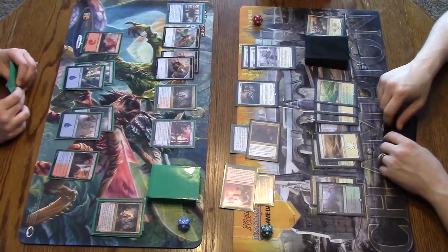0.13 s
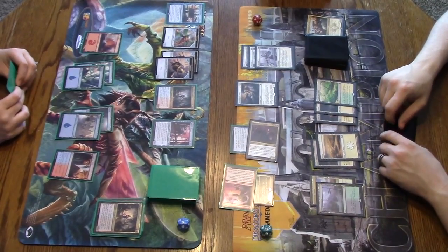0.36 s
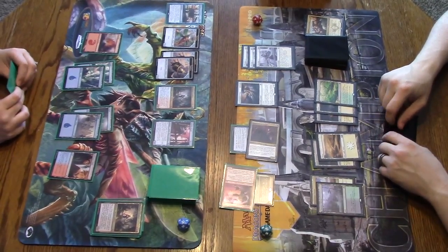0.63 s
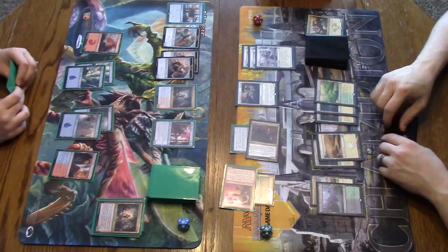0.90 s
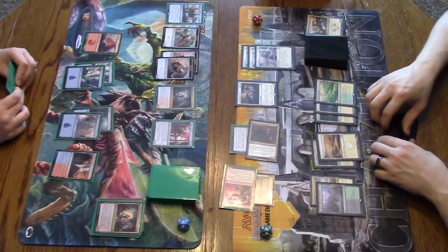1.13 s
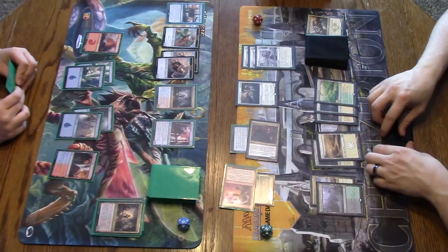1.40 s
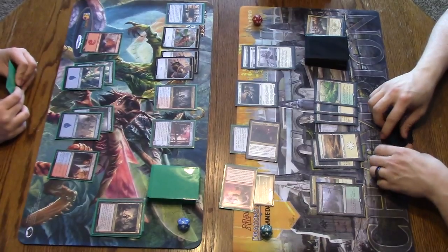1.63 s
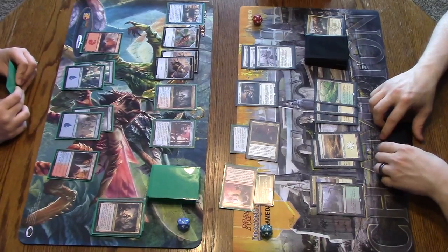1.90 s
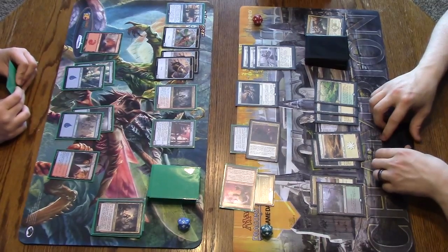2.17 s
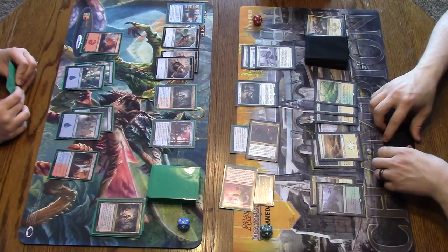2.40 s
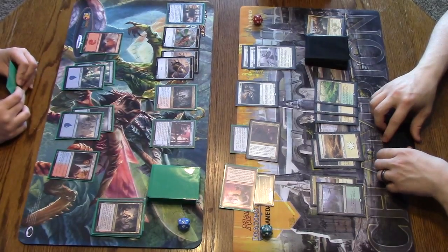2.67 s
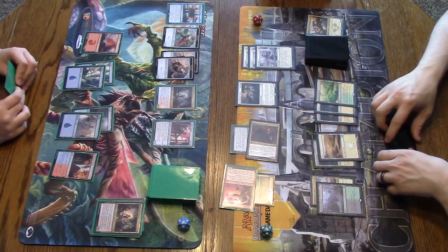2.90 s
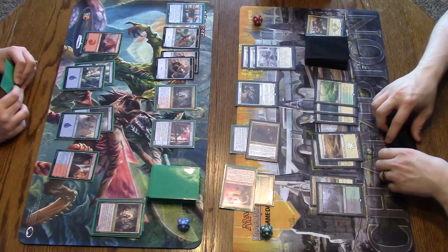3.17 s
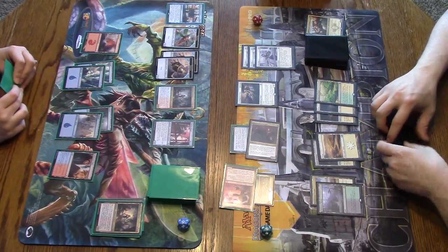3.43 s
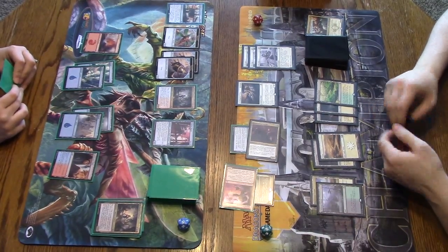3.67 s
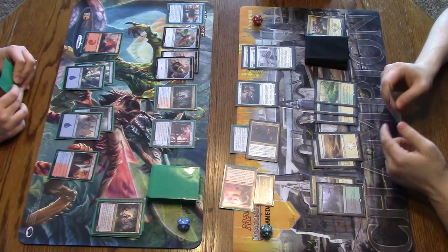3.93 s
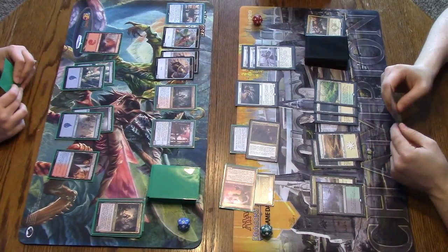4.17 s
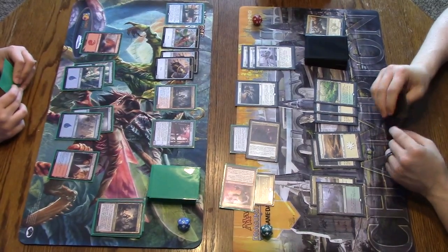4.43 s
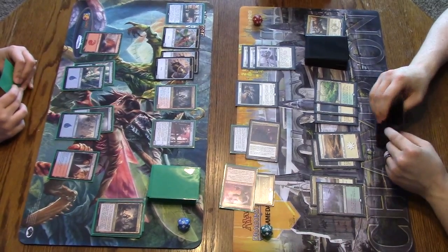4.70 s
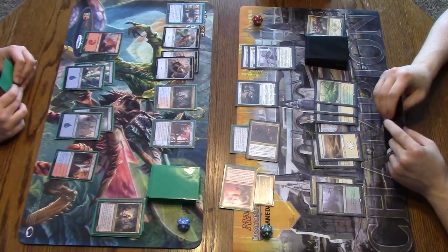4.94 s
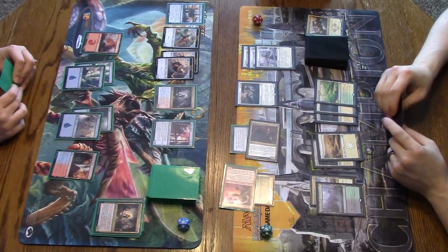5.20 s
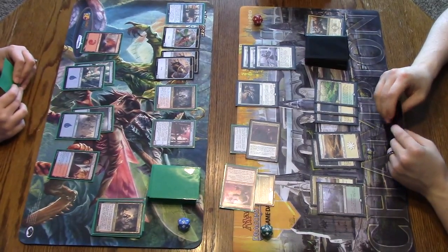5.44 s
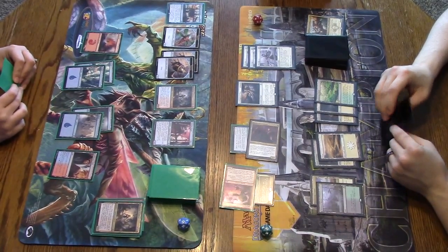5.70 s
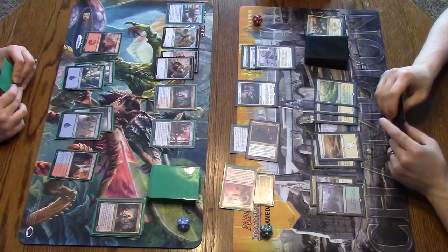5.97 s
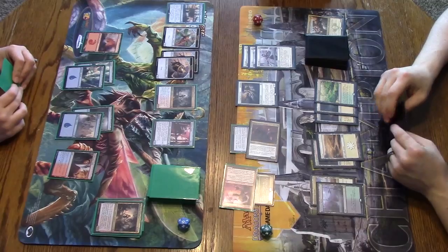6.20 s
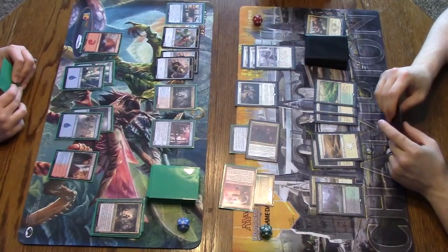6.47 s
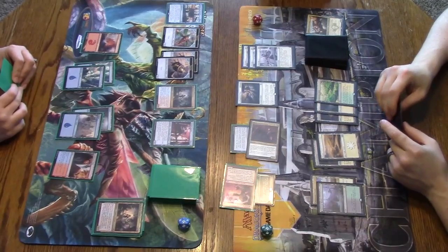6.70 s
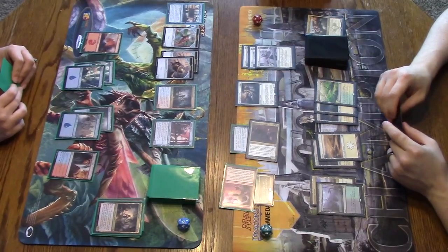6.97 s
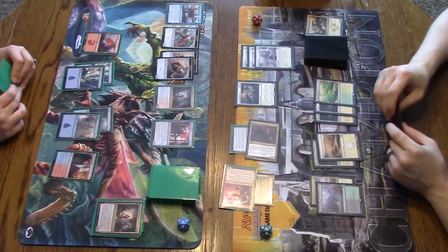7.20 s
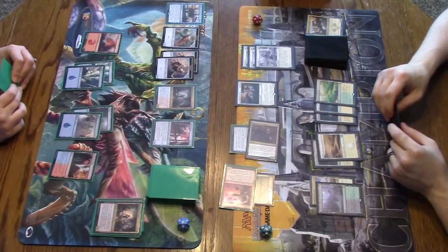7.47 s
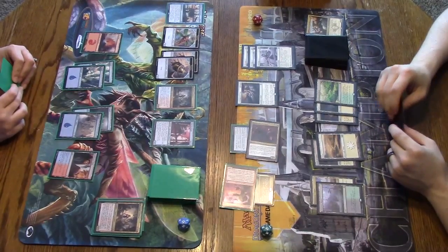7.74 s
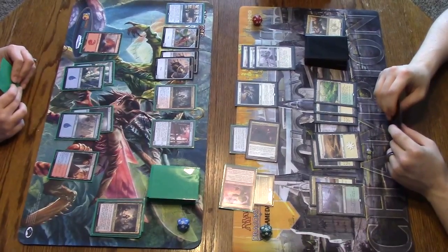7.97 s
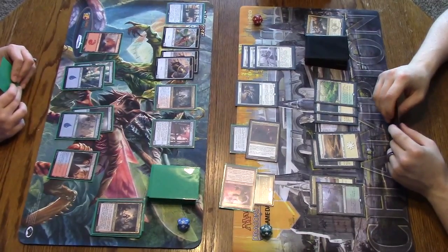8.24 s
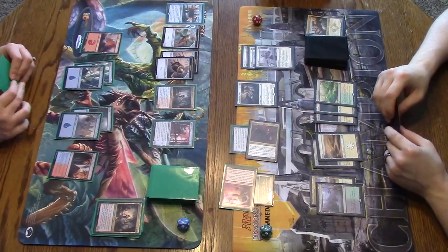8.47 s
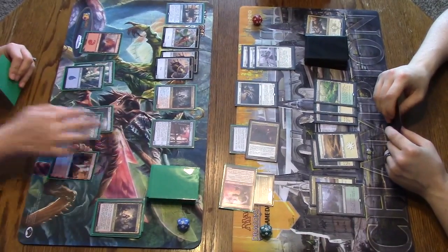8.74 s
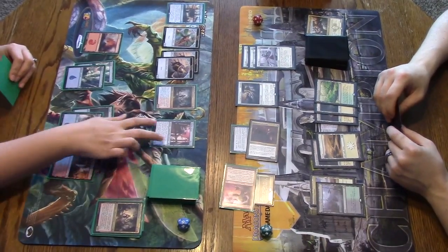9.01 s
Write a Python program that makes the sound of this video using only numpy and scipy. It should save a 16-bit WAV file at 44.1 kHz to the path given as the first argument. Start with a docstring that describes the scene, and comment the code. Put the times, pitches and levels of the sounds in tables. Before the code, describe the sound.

A small quiet room with a wooden table, heard in stereo from a short distance. Soft low hum and hiss run throughout, with a faint whir and a very faint, high lens-motor whine switching on and off in tiny steps. From 0 to 0.9 s fingertips drum six or so dull, woody taps. Light sleeve rustling follows from 1 s, a crisp card snap at 1.7, a louder sharp slap at 2.4 with a brief slide, and another bright crackling snap at 3.3. Quick plastic scuffs cluster around 3.7 to 3.8 s. After a lull, small clicks and firm nail taps come at 4.5 to 5.5 s, with a short slide near 4.9. A finger ring scrapes faintly at 6.15 and more clearly at 6.3. From 6.5 to 9 s irregular light taps and ticks continue, with a faint sleeve rub near 8.5. Short, dense echoes follow the contacts.

```python
"""Sleeved cards at a wooden table

A small quiet room, two players at the table under a camera, heard on two microphones.
Fingertips drum the table's decaying modes, cards snap down as brief crackles, and sleeves slide and scuff
as shaped noise; a finger ring scrapes and rings. Dense echoes give the room its distance. Behind lie
shaped-noise hum and hiss with a faint whir, and the camera's lens motor, a stepped tone and its octave."""
import sys
import numpy as np
from scipy import signal
from scipy.io import wavfile
from scipy.ndimage import uniform_filter1d

SR = 44100
rng = np.random.default_rng(int(sys.argv[2]) if len(sys.argv) > 2 else 0)


def wav_out(sig):
    """Save sig, one row per channel (or a flat mono array), as 16-bit PCM at SR to the path in sys.argv[1]."""
    wavfile.write(sys.argv[1], SR, np.round(np.clip(np.atleast_2d(sig).T, -1, 1) * 32767).astype(np.int16))


def rack_gain(trim_db):
    """Turn a fader trim in dB into the linear factor to multiply a signal by."""
    fader = np.asarray(trim_db, float)
    return 10 ** (fader / 20)


N = 402191  # length [samples]

# Levels in the tables are relative: the functions add the balance between parts. fingertip taps: (time [s],
# thud [dB], firmness: knock against thud [dB], nail tick [dB])
TAPS = [(0.033, -35.5, -12, -49), (0.215, -33.5, -12.5, -46.5), (0.344, -58, -13, -60),
        (0.52, -41, -16.5, -47.5), (0.651, -33.5, -11, -42.5), (0.776, -33, -13, -47.5),
        (0.872, -39, -20, -46), (1.041, -53, -38, -49), (1.316, -50, -12, -57), (2.137, -52.5, -3, -62),
        (2.734, -58, -2.5, -69), (4.715, -40.5, 5.5, -35), (4.799, -65, 1, -52), (5.056, -37.5, -2, -41.5),
        (5.404, -39.5, 2, -32.5), (6.146, -57.5, 3, -70), (6.496, -37, -5, -41.5), (6.843, -50, 6.5, -46),
        (7.048, -40.5, -4, -45.5), (7.226, -43, -4, -46), (7.414, -51.5, -16, -62),
        (7.545, -40, 1.5, -38.5), (7.902, -39.5, 1.5, -37), (8.262, -40.5, 2.5, -40),
        (8.606, -50, -20, -65), (8.772, -47, -9.5, -55), (8.958, -44.5, -1, -47.5)]
# table top modes: (frequency [Hz], level [dB], t60 [s])
TABLE_MODES = [(119, -10, 0.11), (206.9, -10.5, 0.35), (253.4, 8, 0.1), (301, 0.5, 0.06), (375.4, 4, 0.17),
               (453, 6, 0.15), (490, 11, 0.044), (549.7, 7, 0.069), (673, 10, 0.049), (717, -4, 0.13),
               (787, -7, 0.093), (878, -1, 0.084), (1002, -8, 0.059), (1198, -8.5, 0.054)]
# short modes under the nail: (frequency [Hz], level [dB], t60 [s])
NAIL_MODES = [(1040, 5, 0.0024), (1703, 1, 0.011), (2370, 1.5, 0.0054), (3220, -6.5, 0.0059)]
# nail click as the room hears it: (frequency [Hz], level [dB])
TICK_COLOUR = [(400, -8.5), (900, -3.5), (1800, -2), (2700, -4), (3800, -15), (6000, -24.5), (12000, -30)]
# card edges snapping: (time [s], slap [dB], crack [dB], table knock [dB], left raised and right lowered by [dB])
SNAPS = [(1.6938, -30, -25.5, -55, 0.5), (1.6976, -25.5, -62, -37.5, -1), (1.919, -52.5, -47.5, -62, -.4),
         (2.315, -46, -49, -65, -1), (2.4344, -41, -36, -45.5, -.4), (2.4383, -26, -21.5, -39, -1.5),
         (2.4412, -16.5, -22, -47, -.4), (3.2873, -24.5, -16.5, -39, -0.3), (3.2969, -60, -32, -52, -3),
         (3.2895, -37, -37, -65, 4), (3.3016, -39, -31, -42, -2), (3.551, -49, -40, -56, 1.2),
         (3.6692, -60, -55, -60, -.4), (3.777, -34, -36, -53, -.6), (4.451, -50, -33, -51.5, 1.5),
         (4.835, -45.5, -44, -57, -.4), (5.1701, -45, -35.5, -54, 1.2), (5.4156, -61, -55, -73, -.4),
         (6.0867, -72, -55, -71, -.4), (6.1384, -67, -57, -68, -.4), (6.5414, -58, -54, -69, -.4)]
# sleeves sliding: (fastest moment [s], speed-up [s], slow-down [s], rub [dB], hiss above the rub [dB])
SLIDES = [(.035, .008, .01, -73, 16), (.217, .008, 0.013, -70.5, 17.5), (.255, .006, .008, -73, 21),
          (.519, .008, .01, -71.5, 19), (.65, .008, .008, -76, 19), (.777, .01, .012, -69.5, 18.5),
          (1.0, 0.066, 0.1, -75, 16), (1.05, 0.052, .12, -62, -1), (1.135, 0.046, .08, -66, 2),
          (1.27, 0.21, 0.38, -63, -0.5), (1.42, 0.12, 0.23, -63.5, 2.5), (1.72, 0.012, 0.094, -49.5, 2.5),
          (1.98, 0.13, 0.28, -63.5, .5), (2.132, 0.027, .14, -64.5, -3), (2.324, 0.12, .1, -65, -1),
          (2.48, .01, 0.12, -40.5, -11.5), (2.64, 0.082, .4, -70, -1), (2.96, .2, 0.32, -79, 0),
          (3.27, 0.092, 0.032, -68, 14.5), (3.325, .01, 0.13, -47.5, -4), (3.504, 0.043, 0.035, -62.5, 4.5),
          (3.55, 0.0061, 0.018, -61, -14), (3.69, 0.25, 0.041, -64, 8), (3.75, 0.033, 0.064, -48, -2),
          (3.776, .025, 0.033, -40.5, -5), (3.82, 0.028, 0.054, -49.5, 1.5), (4.42, 0.017, 0.015, -61, 5),
          (4.46, .01, .08, -68, 7), (4.881, 0.058, 0.019, -45.5, -4), (5.175, 0.0054, .03, -65, -7),
          (5.532, .1, .07, -62, -8), (5.758, .02, .04, -59.5, -7), (6.29, 0.011, 0.037, -53.5, -2),
          (6.686, 0.13, 0.13, -58.5, -25), (8.427, .015, .09, -63, -6), (8.506, .02, 0.68, -70.5, 3)]
# colour of the low rub: (frequency [Hz], level [dB])
RUB_COLOUR = [(80, -45), (250, -22), (800, 3), (1900, 5), (3500, 3), (6000, -6), (9000, -22)]
# colour of the bright hiss: (frequency [Hz], level [dB])
HISS_COLOUR = [(2500, 6), (5000, 5), (8000, 5.5), (12000, 3), (14500, -4), (16500, -33)]
# soft narrow scuffs: (time [s], length [s], band [Hz], level [dB])
SCUFFS = [(1.044, 0.053, 2020, -59.5), (3.736, 0.049, 2150, -52), (4.86, .06, 2330, -65),
          (6.619, 0.076, 4350, -68), (6.691, 0.097, 1820, -64.5)]
# finger ring scrapes: (time [s], scrape [dB], length [ms], ring [dB])
CLINKS = [(6.146, -45, 11, -50.5), (6.302, -37, 14.4, -36.5)]
# metal modes of the finger ring: (frequency [Hz], level [dB], t60 [s])
RING_MODES = [(3120, -15.5, 0.43), (3190, 3, 0.045), (3440, -14, 0.15), (6380, 0, 0.021), (9100, -1, .015),
              (11200, -1, 0.027)]
# colour of the ring's scrape: (frequency [Hz], level [dB])
SCRAPE_COLOUR = [(600, -5), (1500, 1), (3500, -4), (9000, 0), (13000, -2), (16000, -32)]
# decay of the room: (frequency [Hz], t60 [s])
ROOM_DECAY = [(150, 0.3), (400, 0.4), (1040, 0.27), (2760, 0.14), (7280, 0.16), (13000, 0.083)]
# left-right difference of the echoes: (frequency [Hz], level [dB])
ECHO_WIDTH = [(200, -31), (700, -27.5), (2500, -18.5), (8000, -13), (14000, -21)]
# background hum and hiss, sum of both microphones, treble cut off near 16 kHz: (frequency [Hz], density [dB per Hz])
AIR_COLOUR = [(18, -35), (30, -26), (58, -16), (75, -18.5), (103, -1), (179, -3.5), (215, 0.5), (295, -1.5),
              (426, -0.5), (461, -2), (937, -7.5), (3140, -15.5), (5740, -19.5), (6210, -19.5),
              (15600, -30.5), (16100, -53)]
# left-right difference of that background against the sum: (frequency [Hz], level [dB])
AIR_WIDTH = [(60, 6.5), (110, -13), (200, -5.5), (380, -6), (700, -4.5), (1290, -6), (2380, -6.5),
             (4400, -7), (8120, -10.5), (15000, -48)]
# lens motor runs, sounding every second step: (first step [count], last step [count])
MOTOR_RUNS = [(1, 17), (25, 27), (28, 32), (33, 35), (44, 48), (53, 57), (65, 67), (77, 79), (80, 92),
              (98, 102), (108, 124), (129, 135)]
# weaker motor runs, likewise: (first step [count], last step [count])
WEAK_MOTOR_RUNS = [(38, 42), (58, 64), (72, 74), (93, 97), (103, 107), (125, 127)]

BOOM_HZ, KNOCK_HZ = 150, 330  # table modes: boom below the first, thud up to the second, knock above
BOOM_DB, BOOM_PER_FIRM = -7, -0.5  # boom against thud; soft flat fingertips boom more [dB per dB]
RISE_S, RISE_PER_FIRM = 0.0025, -0.31  # swing-up at firmness 0; firm fingertips start faster [dB per dB]
SIZZLE_DB, SIZZLE_PER_CRISP = -12, 0.089  # top treble against the crack column; more in crisp snaps [dB per dB]
SNAP_PEAK_MS = 0.62  # when a snap's crackle is fullest
STROKE_DB = 20  # level lost over one speed-up or slow-down time
AIR_DB = -59.5  # rms of the two-microphone mean
WHIR_HZ, WHIR_WIDTH_HZ, WHIR_DB = 1536, 33, 9.5  # a faint whir standing out of the air
STEP_S, FIRST_STEP_S, MOTOR_HZ = 1 / 15, .015, 5561.8
MOTOR_DB, MOTOR_WEAK_DB = -73.5, -4.5  # rms of the drive tone; weak runs against it


def evened(x):
    """Scales to rms 1."""
    return x / np.sqrt(np.mean(x ** 2) + 1e-20)


def read(points, hz):
    """Reads a spectrum on a log-frequency axis."""
    f, value = np.transpose(points)
    return np.interp(np.log(hz + 1), np.log(f + 1), value)


def add(mix, s, sound):
    """Mixes a sound in at time s."""
    part = mix[round(s * SR):][:len(sound)]
    part += sound[:len(part)]


def colour(x, points):
    """Causal minimum-phase filter with the given dB spectrum and energy 1."""
    hz = abs(np.fft.fftfreq(2048, 1 / SR))
    log_gain = np.log(rack_gain(read(points, hz)))
    taps = np.fft.ifft(np.exp(np.conj(signal.hilbert(log_gain)))).real[:1024]
    return signal.oaconvolve(x, taps / np.linalg.norm(taps))[:len(x)]


def rings(modes, rise_s, shift_db=0, detune=1):
    """Sum of dying sines with a soft start, as a struck body vibrates."""
    t = np.arange(SR // 3) / SR
    hz, db, t60 = np.transpose(modes)[:, :, None]
    decay = rack_gain(db + np.reshape(shift_db, (-1, 1)) - 60 * t / t60)
    sines = decay * np.sin(2 * np.pi * hz * detune * t)
    return sines.sum(0) * (1 - np.exp(-t / rise_s))


def fingertips():
    """The nail ticks first; the slower table top swings up just after, each spot favouring other modes."""
    nail, click, wood = np.zeros((3, N))
    hz = np.transpose(TABLE_MODES)[0]
    spots = rng.standard_normal((len(TAPS), len(TABLE_MODES) + 1))
    for (s, thud_db, firm_db, tick_db), spot in zip(TAPS, spots):
        boom_db = BOOM_DB + BOOM_PER_FIRM * firm_db
        blow_db = thud_db + np.select([hz < BOOM_HZ, hz < KNOCK_HZ], [boom_db, -3.0], firm_db - 5.0)
        rise_s = RISE_S * rack_gain(RISE_PER_FIRM * firm_db)
        ticking = rings(NAIL_MODES, 0.0003, detune=1 + 0.061 * spot[-1])
        swing = rings(TABLE_MODES, rise_s, blow_db + 1.6 * spot[:-1], detune=1 + 0.011 * spot[:-1, None])
        add(nail, s + 0.002203, rack_gain(tick_db + 8.0) * ticking)
        add(click, s + 0.002147, rack_gain([tick_db + 17.5]))
        add(wood, s + 0.002913, -swing)
    return nail, colour(click, TICK_COLOUR), wood


def snaps():
    """Each snap is a brief crackle around a sharp spike; the room answers to the spike's smooth colour."""
    near = np.zeros((N, 2))
    far, wood = np.zeros((2, N))
    t = np.arange(1500) / SR
    hz = np.linspace(0, SR / 2, 500)
    u = 1000 * t / SNAP_PEAK_MS
    spike = -1. * (np.arange(len(t)) == int(.6 * SR / 1000))  # 0.6 ms in
    grits = rng.standard_normal((len(SNAPS), 1500))
    for (s, slap_db, crack_db, knock_db, left_db), grit in zip(SNAPS, grits):
        sizzle_db = crack_db + SIZZLE_DB + SIZZLE_PER_CRISP * (crack_db - slap_db)
        crack_db, slap_db = crack_db - 5.0, slap_db + 4.5
        tone = [(300, slap_db - 25), (900, slap_db - 3), (1900, slap_db),
                (3800, (slap_db + crack_db) / 2 - 0.5), (6500, crack_db),
                (11000, sizzle_db), (14000, sizzle_db - 7), (17000, sizzle_db - 29)]
        size = rack_gain(21.5) * np.sqrt(np.mean(rack_gain(read(tone, hz)) ** 2))
        burst = spike + 0.32 * grit * u * np.exp(1 - u)
        crackle = size * colour(burst / np.linalg.norm(burst), tone)
        add(near, s, np.outer(crackle, rack_gain([left_db, -left_db])))
        add(far, s, size * colour(spike, tone))
        add(wood, s, rings(TABLE_MODES, 0.003, knock_db - 7.0 + 1.6 * grit[:len(TABLE_MODES)]))
    return near.T, far, wood


def slides():
    """Plastic rubbing on plastic: noise rough with small slips and grit; strokes speed up and slow down."""
    rub, hiss = np.zeros((2, N))
    for s, up, down, rub_db, hiss_db in SLIDES:
        t = np.arange(-2 * up, 2 * down, 1 / SR)
        stroke = rack_gain(rub_db - STROKE_DB * np.maximum(-t / up, t / down))
        add(rub, s + t[0], stroke)
        add(hiss, s + t[0], stroke * rack_gain(hiss_db))
    slips = rack_gain(3.5 * evened(uniform_filter1d(rng.standard_normal(N), size=250)))
    grit_size = rack_gain(1.5 * np.minimum(rng.exponential(1, N), 5))
    grit = grit_size * (rng.random(N) < 300 / SR)  # about 300 grains a second
    grain = evened(slips * (rng.standard_normal((2, N)) + 2.5 * grit))
    return colour(rub * grain[0], RUB_COLOUR) + colour(hiss * grain[1], HISS_COLOUR)


def scuffs():
    """A sleeve edge dragged lightly: a breathy band of noise about half an octave wide."""
    out = np.zeros(N)
    grits = rng.standard_normal((len(SCUFFS), SR // 4))
    for (s, length, hz, db), grit in zip(SCUFFS, grits):
        stroke = np.sin(np.pi * np.clip(np.arange(len(grit)) / SR / length, 0, 1))
        band = [(hz / 1.46, -30), (hz / 1.45, 0), (hz * 1.04, 0), (hz * 2.1, -30)]
        add(out, s, rack_gain(db) * colour(stroke * grit, band))
    return out


def clinks():
    """A small metal band scrapes harder and harder for a moment and rings as it catches."""
    out = np.zeros(N)
    grits = rng.standard_normal((len(CLINKS), 1500))
    for (s, db, ms, ring_db), grit in zip(CLINKS, grits):
        progress = np.clip(np.arange(1500) / SR * 1000 / ms, 0, 1)
        scrape = grit * np.sin(np.pi * progress ** 1.5) ** 2
        add(out, s, rack_gain(db) * colour(scrape, SCRAPE_COLOUR))
        ring = rings(RING_MODES, 0.00099, ring_db)
        # the loose band chatters on the finger
        rattle = evened(uniform_filter1d(rng.standard_normal(len(ring)), size=60))
        add(out, s + 0.68 * ms / 1000, ring * (.4 + 0.9 * rattle))
    return out


def room(x):
    """Dense echoes, each band dying at its own speed; three patterns fade into one another in steady rotation."""
    grid = np.arange(60, SR // 3, 12)
    taps = np.zeros((6, SR // 3 + 12))  # three patterns for the sum, three for the left-right difference
    spots = grid + rng.integers(0, 12, (6, len(grid)))
    np.put_along_axis(taps, spots, rng.choice([-1., 1.], (6, len(grid))), 1)
    hz, t, z = signal.stft(taps, SR, nperseg=256)
    z[3:] *= rack_gain(read(ECHO_WIDTH, hz))[:, None]
    decay = rack_gain(-60 * t / read(ROOM_DECAY, hz)[:, None])
    tail = signal.istft(z * decay, SR, nperseg=256)[1]
    tail[:, :60] = 0  # no echo before the first reflection
    # 1.3 rounds a second, so that repeated sounds get varied echoes
    turns = 1.3 * np.arange(N) / SR + np.arange(3)[:, None] / 3
    blend = np.sqrt(2 / 3) * np.cos(2 * np.pi * turns)
    sent = np.tile(x * blend, (2, 1))
    echoes = signal.oaconvolve(sent, tail / np.linalg.norm(tail[0]), axes=1)[:, :N]
    mid, side = echoes.reshape(2, 3, N).sum(1)
    return mid + np.outer([1, -1], side)


def lens_motor():
    """A steady drive tone and its octave, switched on for one step at a time."""
    t = np.arange(N) / SR
    level = np.zeros(int(N / SR / STEP_S) + 2)
    for runs, db in [(MOTOR_RUNS, MOTOR_DB), (WEAK_MOTOR_RUNS, MOTOR_DB + MOTOR_WEAK_DB)]:
        for first, last in runs:
            level[first:last + 1:2] = rack_gain(db) * np.sqrt(2)
    running = level[((t - FIRST_STEP_S) // STEP_S).astype(int)]
    turn = 2 * np.pi * MOTOR_HZ * t
    return uniform_filter1d(running, size=200) * (np.sin(turn) + rack_gain(-19) * np.sin(2 * turn))


def air():
    """Room hum and microphone hiss: shaped noise, gently patchy in time and frequency."""
    frames, hz = N // 256 + 5, np.fft.rfftfreq(1024, 1 / SR)
    a, b, c, d, patches = rng.standard_normal((frames, 513, 5)).T
    patches = uniform_filter1d(patches, size=14, axis=0)
    patches = evened(uniform_filter1d(patches, size=16, axis=1))
    whir_db = WHIR_DB * np.exp(-((hz - WHIR_HZ) / WHIR_WIDTH_HZ) ** 2)
    shape_db = read(AIR_COLOUR, hz) + whir_db
    z = np.array([a + 1j * b, (c + 1j * d) * rack_gain(read(AIR_WIDTH, hz))[:, None]])
    z = z * rack_gain(shape_db[:, None] + 0.94 * patches)
    mid, side = signal.istft(z, nperseg=1024, noverlap=768)[1][:, :N]
    return rack_gain(AIR_DB) * np.array([mid + side, mid - side]) / np.std(mid)


def scene():
    """Table sounds, direct and through the room, over the air and the motor."""
    nail, click, tapped = fingertips()
    near, far, slapped = snaps()
    rustle = clinks() + scuffs() + rack_gain(-5.5) * slides()
    wood = tapped + slapped
    direct = wood + nail + rack_gain(-16) * click + near + rustle
    echoes = room(rack_gain(-9.5) * wood + click + rack_gain(-2.3) * far + rack_gain(-4.0) * rustle)
    low_cut = signal.butter(3, 75, "high", fs=SR, output="sos")  # the microphones lose deep bass
    table = signal.sosfilt(low_cut, direct + echoes) * rack_gain([[-.2], [.2]])  # left, right [dB]
    return table + air() + lens_motor()


def top_cut(x):
    """Nothing passes above the cut-off."""
    return signal.sosfilt(signal.butter(12, 16500, fs=SR, output="sos"), x)


def record(dry):
    """Takes down the finished two-microphone mix."""
    return top_cut(dry)


dry = scene()
out = record(dry)
wav_out(out)
```